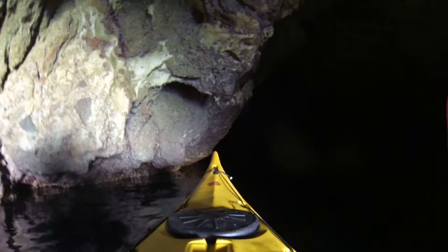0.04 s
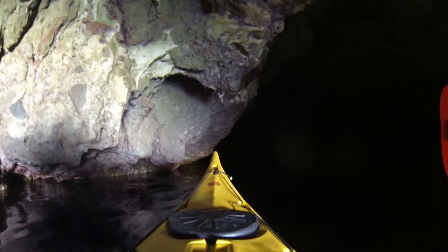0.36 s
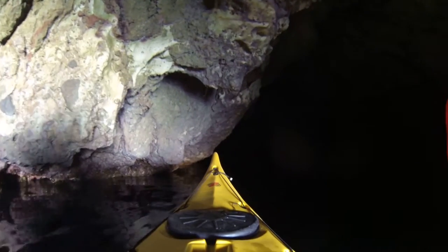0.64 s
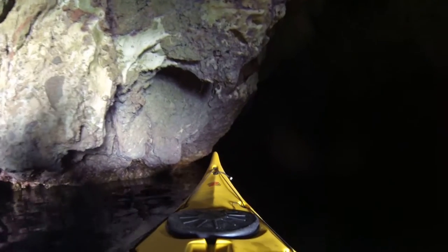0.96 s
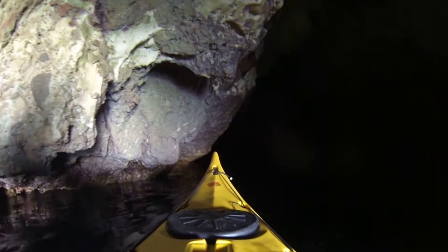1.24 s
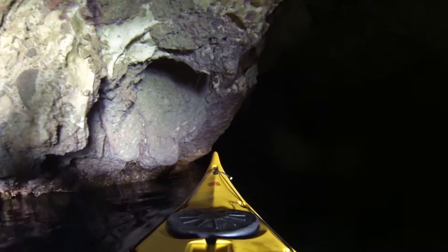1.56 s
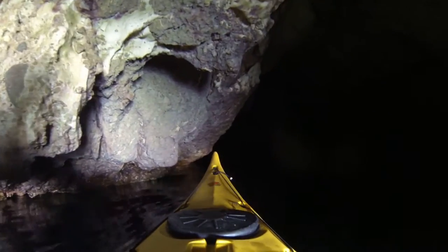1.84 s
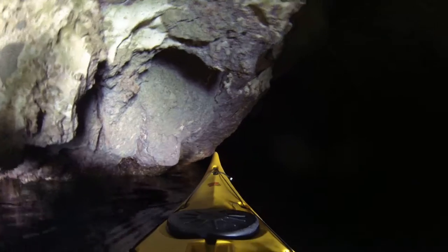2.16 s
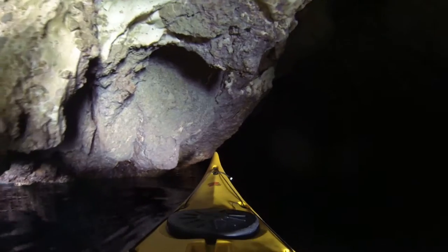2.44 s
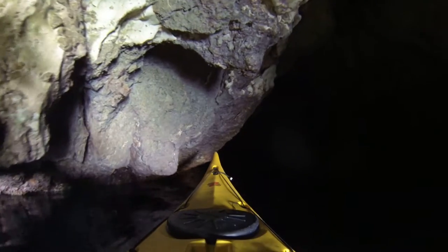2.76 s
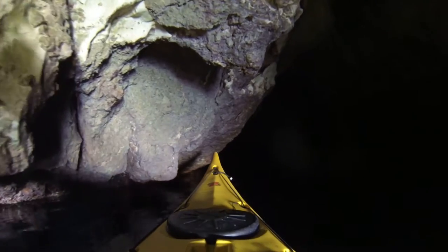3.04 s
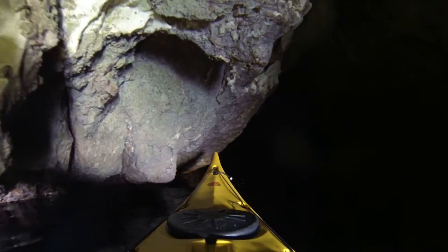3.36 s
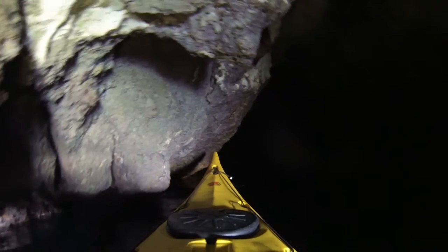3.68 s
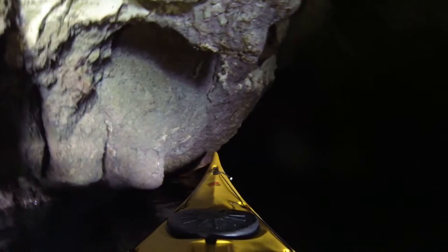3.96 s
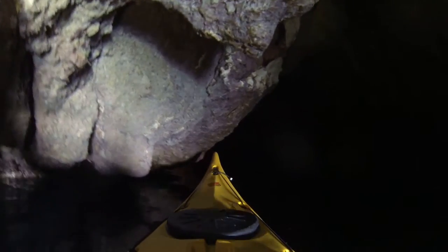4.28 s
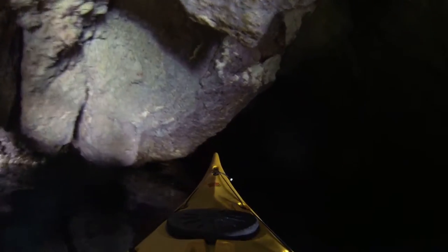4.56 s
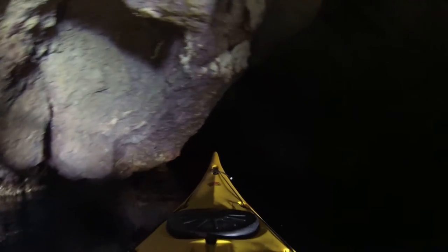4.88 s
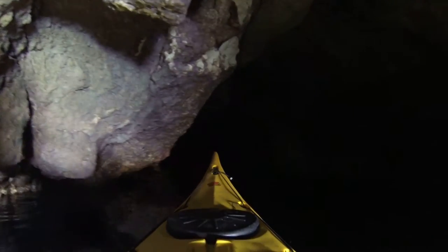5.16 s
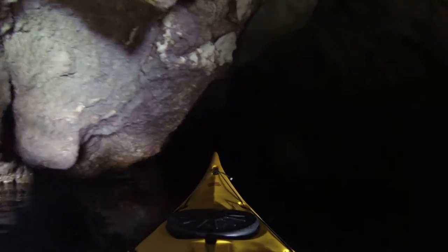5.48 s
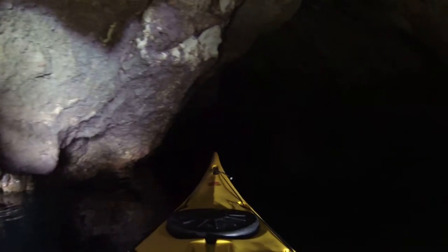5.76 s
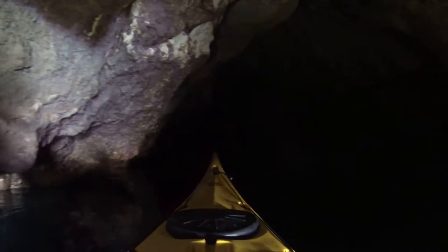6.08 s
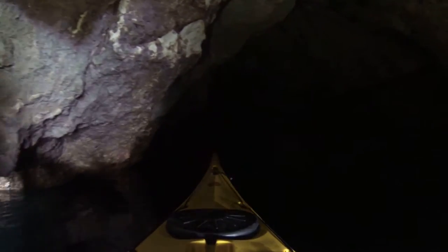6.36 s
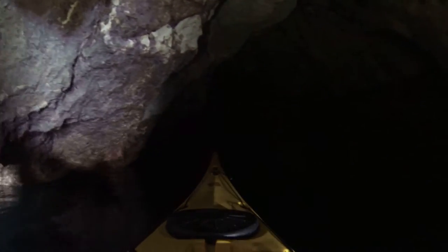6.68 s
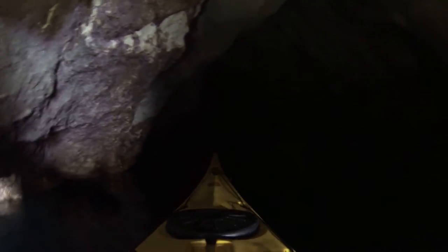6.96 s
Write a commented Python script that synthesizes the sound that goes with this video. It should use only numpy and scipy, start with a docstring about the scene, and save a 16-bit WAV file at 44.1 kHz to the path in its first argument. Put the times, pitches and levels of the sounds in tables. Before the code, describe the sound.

A kayak bumps against rock in a sea cave with a loud, hollow double thud, and the cave air answers with a deep, throbbing boom. Softer knocks and laps on the hull follow. Then small splashes and ringing bubble plinks come from the wall and thin out to a quiet wash. Swell rumbles low throughout. The microphone is close, on the deck, with short echoes off the rock.

```python
"""A kayak's hull bumps the rock in a sea cave and rings, and the air in the cave booms.
Swell rumbles, traps humming air in the hollows and slaps the boat. Water washes along the
walls with small splashes and ringing bubbles, and the close rock throws back echoes.
It is heard from a camera on the deck, whose case colours the water sounds."""
import sys
import numpy as np
from scipy import signal
from scipy.fft import rfft, irfft
from scipy.io import wavfile
from scipy.ndimage import uniform_filter1d

SR = 44100
rng = np.random.default_rng(int(sys.argv[2]) if len(sys.argv) > 2 else 0)


def output_pcm(signal):
    """Save a mono or channel-first signal as 16-bit PCM at the path in sys.argv[1].

    Samples are clipped to [-1, 1] before scaling.
    """
    pcm = np.clip(np.atleast_2d(signal).T, -1, 1) * 32767
    wavfile.write(sys.argv[1], SR, np.round(pcm).astype(np.int16))


N = 309582
TIME = np.arange(N) / SR

# Levels are relative. t60 is the time a sound takes to fade by 60 dB.
# the hull hits the rock: t/s, level/dB, contact time/s, slap compared with the blow/dB, slap t60/s
ROCK_KNOCKS = [(0.2419, -33.5, 0.00066, 14, 0.047), (0.47, -18.5, 0.0039, -23, 0.18),
               (0.492, -7.5, 0.0096, -14.5, 0.17), (.528, -3.5, 0.0015, -2.5, 0.33),
               (0.554, -26.5, .008, 16.5, 0.3), (1.388, -23.5, 0.0015, -6, 0.63),
               (1.545, -21, 0.007, 0.5, 0.11)]
# water laps against the hull: t/s, level/dB
HULL_LAPS = [(1.023, -17.5), (1.919, -20.5), (1.966, -23), (3.44, -29.5), (3.704, -27), (5.632, -27.5),
             (5.911, -31), (6.282, -32), (6.56, -36), (6.7, -31.5)]
# the tones a struck hull rings with: f/Hz, level/dB, t60/s
HULL_TONES = [(93.3, -9.5, 0.25), (110.2, 0.5, 0.23), (132.8, -4, 0.19), (162.8, -6.5, 0.25),
              (200.2, -3.5, 0.12), (261, -24.5, 0.26), (287.2, -12, 0.092), (395, -11.5, 0.13),
              (446, -29.5, 0.32), (654, -49, 0.061), (785, -37, .05), (958, -10, 0.038)]
# the short clack right where the hull is hit: f/Hz, level/dB, t60/s
CLACK_TONES = [(297, -13.5, 0.088), (864, -20.5, 0.052), (1478, -11, 0.045)]
# the deep tones of the air in the cave: f/Hz, level/dB, t60/s
CAVE_TONES = [(35.9, -17.7, .98), (39.1, -19.3, 1.9), (41.8, -3.9, 1.03), (46.9, -20.2, 1.7)]
# the swell rises and falls: t/s, rumble level/dB, slosh level/dB
SWELL_LEVELS = [(0, -43, -53.5), (1.15, -35, -52.5), (1.75, -42, -58), (2.8, -46.5, -57), (3.5, -43.5, -55),
                (4.2, -49.5, -61), (4.6, -42, -59), (5.15, -52.5, -63), (5.55, -45, -58),
                (6.03, -48, -61.5), (7.02, -42.5, -62.5)]
# the swell closes a hollow in the rock: t/s, level/dB, f/Hz, length/s
HOLLOW_GULPS = [(0.367, -31, 49.5, .12), (0.836, -31.5, 95.2, 0.18), (1.285, -30, 37.9, 0.18),
                (2.008, -27, 39.7, 0.17), (2.251, -33.5, 92.4, 0.23), (2.632, -35, 89.5, 0.23),
                (2.781, -36, 86, 0.3), (3.396, -36, 64.4, 0.13), (4.419, -38, 39, 0.19),
                (4.866, -35, 42.6, 0.1), (5.381, -42, 93.1, 0.28), (6.096, -32.5, 43.2, 0.097),
                (6.722, -34.5, 47.1, 0.16)]
# small waves run up the rock: t/s, level/dB, hold time/s
SMALL_WAVES = [(0, -57, 0.64), (0.542, -51, 0.48), (2.106, -54, 0.43), (2.762, -53, 0.18),
               (2.99, -55, 0.24), (3.334, -54, 0.16), (4.215, -64.5, .08), (4.975, -61, 0.14),
               (5.332, -56, 0.091), (5.668, -62.5, 0.36), (6.057, -56.5, 0.28), (6.405, -59, 0.26),
               (6.664, -53.5, 0.11), (6.898, -57.5, .1)]
# ripples break on the rock: t/s, level/dB, rise time/s, t60/s, treble cutoff/Hz
ROCK_SPLASHES = [(2.068, -48, 0.003, 0.16, 2500), (2.229, -44.5, 0.0097, 0.9, 12000),
                 (2.273, -43, 0.013, 0.33, 9000), (2.303, -37.5, 0.0015, 0.075, 9000),
                 (2.551, -44.5, .005, 0.2, 2500), (2.735, -46.5, 0.0047, 0.21, 5030),
                 (2.957, -42.5, 0.0017, 0.12, 1000), (2.975, -39.5, 0.0074, 0.12, 9000),
                 (3.026, -41.5, 0.0018, 0.1, 2500), (3.11, -47, 0.0016, 0.1, 8850),
                 (3.169, -39.5, 0.0017, 0.063, 2500), (3.369, -41, 0.002, 0.079, 2000),
                 (3.534, -48.5, 0.001, 0.18, 2480), (6.579, -52, 0.022, 0.5, 12000),
                 (6.688, -53, 0.036, 0.32, 4000)]
# large bubbles, plus two drip ticks at 3.497 s and 3.882 s: t/s, level/dB, f/Hz
BIG_BUBBLES = [(0.363, -43.5, 296), (2.04, -50, 790), (2.039, -44, 1500), (2.071, -44, 1476),
               (2.16, -51, 560), (2.189, -39.5, 1395), (2.28, -31.5, 1510), (2.37, -38, 1566),
               (2.475, -38.5, 1474), (2.558, -41.5, 2500), (2.722, -44, 2440), (3.03, -33, 1590),
               (3.091, -33, 1584), (3.378, -49, 696), (3.497, -55, 11000), (3.534, -39, 1550),
               (3.658, -37, 1600), (3.77, -48, 797), (3.831, -46.5, 1590), (3.882, -57.5, 5300),
               (6.112, -42, 1510), (6.265, -43.5, 1690), (6.75, -40, 1663)]
# how strong each noisy sound is from bass to treble: f/Hz, level/dB
SLAP_SPECTRUM = [(60, 8), (190, 10.5), (380, 10), (480, -15.5), (700, 0), (1000, -16.5), (1250, -13),
                 (1600, -5.5), (2300, -9.5), (4000, -17), (4700, -23.5), (5600, -18.5), (7000, -29.5),
                 (14000, -49)]
RUMBLE_SPECTRUM = [(10, -17), (28, -1), (42, 11), (54, 5.5), (70, 0.5), (89, 6.5), (100, -2), (115, -16.5),
                   (160, -62)]
SLOSH_SPECTRUM = [(70, -13.5), (115, 2), (175, 0), (230, -9), (380, -10.5), (600, -20.5), (1200, -21.5),
                  (4000, -89.5)]
WASH_SPECTRUM = [(200, 1.5), (450, -5), (700, -9), (1220, -12.5), (1450, 0), (1800, -1.5), (2150, -5.5),
                 (3150, -9), (4600, -21.5), (5400, -17.5), (6500, -27), (9000, -34.5), (15000, -54)]
SPRAY_SPECTRUM = [(200, -24), (600, -16.5), (1220, -18.5), (1550, -4.5), (2100, -17), (3200, -14),
                  (4600, -25.5), (5400, -23.5), (7000, -32.5), (10000, -39), (15000, -43)]
HISS_SPECTRUM = [(100, -12), (600, 15), (2000, 8), (5000, 4), (9000, -4), (14500, -9), (16000, -22)]
# pitches that the camera case makes louder: f/Hz, width/Hz, boost/dB
CASE_PEAKS = [(870, 70, 3.5), (1051, 140, 9), (1407, 246, 7), (1680, 160, 2)]


def hull_knocks(slap_db=-23, lap_contact_s=0.0086, lap_slap_db=-12, lap_t60_s=0.23):
    """Each blow rings the hull and makes water slap. A long, soft push rings mainly the low tones."""
    t, knocks, slap_power = TIME[:SR], np.zeros(N), np.zeros(N)
    shell = ring(HULL_TONES, t, rise_cycles=2.2)
    clack = ring(CLACK_TONES, t, rise_cycles=0.99)
    laps = [(s, db, lap_contact_s, lap_slap_db, lap_t60_s) for s, db in HULL_LAPS]
    for start, db, contact, wet_db, t60 in ROCK_KNOCKS + laps:
        push = t * np.exp(-2 * np.pi * t / contact)
        body = shell + amp(wet_db) * clack  # a hard slap clacks too
        add(knocks, start, amp(db) * signal.fftconvolve(body, push / push.sum())[:SR])
        slap = amp(db + wet_db) * burst(t, 0.84 * contact, t60)  # a soft contact slaps softly
        add(slap_power, start, slap ** 2)
    slap_noise = steadied(noise(SLAP_SPECTRUM, CASE_PEAKS), samples=500)
    return knocks, amp(slap_db) * np.sqrt(slap_power) * slap_noise


def cave_boom(bump_s=0.538):
    """The bump sets the cave's air ringing. Its deep tones lie close together, so they throb."""
    out = np.zeros(N)
    add(out, bump_s, ring(CAVE_TONES, TIME[:2 * SR], rise_cycles=1.27))
    return out


def swell(level_db=-0.5):
    """Heaving water makes a deep rumble and sloshes along the hull."""
    times, rumble_db, slosh_db = np.transpose(SWELL_LEVELS)
    rumble = amp(np.interp(TIME, times, rumble_db)) * steadied(noise(RUMBLE_SPECTRUM), samples=6000)
    slosh = amp(np.interp(TIME, times, slosh_db)) * steadied(noise(SLOSH_SPECTRUM), samples=6000)
    return amp(level_db) * (rumble + slosh)


def gulps(level_db=-1, waver=0.052):
    """Air trapped by the swell hums briefly at an unsteady pitch."""
    out = np.zeros(N)
    wander = 1 + waver * drift(hz=40)
    for start, db, hz, length in HOLLOW_GULPS:
        pitch = hz * wander[round(start * SR):][:round(length * SR)]
        phase = 2 * np.pi * np.cumsum(pitch) / SR
        fade = signal.windows.cosine(len(phase)) ** 0.67
        add(out, start, amp(db + level_db) * fade * np.sin(phase))
    return out


def wash(fizz_db=-2.5, drops_db=-7, gurgle_db=-10, flutter_db=0.5):
    """Water runs over the rock as fizz, countless droplets and a gurgle of longer-ringing bubbles."""
    fizz = amp(fizz_db) * rng.standard_normal(N)
    drops = amp(drops_db) * tiny_bubbles(density=2000, spread_db=0, ring_cycles=22, pitches=30)
    gurgle = amp(gurgle_db) * tiny_bubbles(density=330, spread_db=1.5, ring_cycles=115, pitches=47)
    flutter = amp(flutter_db * drift(hz=12))
    return colour(wave_strength() * flutter * (fizz + drops + gurgle), WASH_SPECTRUM, CASE_PEAKS)


def wave_strength(calm_db=-63.5, rise_s=0.013, fall_s=0.062, trickle_s=0.47, trickle_share=0.73):
    """Each small wave rises above the calm wash and holds. Some drops back, the rest trickles off."""
    power = np.full(N, amp(calm_db) ** 2)
    rise = 1 - np.exp(-TIME / rise_s)
    for start, db, hold in SMALL_WAVES:
        after_hold = np.maximum(TIME - hold, 0)
        fall = (1 - trickle_share) * np.exp(-after_hold / fall_s)
        trickle = trickle_share * np.exp(-after_hold / trickle_s)
        add(power, start, (amp(db) * rise * (fall + trickle)) ** 2)
    return np.sqrt(power)


def tiny_bubbles(density, spread_db, ring_cycles, pitches):
    """Tiny bubbles ping at random moments, each rising in pitch as it fades."""
    t, out = TIME[:2048], np.zeros(N)
    for hz in np.geomspace(500, 13000, pitches):
        strength = amp(spread_db * np.minimum(rng.exponential(1, N), 4))
        chance = density * (hz / 2000) ** 0.5 / pitches / SR  # high pings come more often
        starts = rng.random(N) < chance
        ping = burst(t, 0.4 / hz, ring_cycles / hz) * np.sin(2 * np.pi * hz * t * (1 + 3 * t))
        out += signal.oaconvolve(strength * starts, ping * hz ** 0.75)[:N]
    return unit(out)


def splashes(level_db=1, tick_db=10):
    """Ripples break on the rock as dull plops and brighter sprays. Quick ones start with a tick."""
    t, out = TIME[:SR], np.zeros(N)
    for start, db, rise, t60, cutoff_hz in ROCK_SPLASHES:
        spray = burst(t, rise, t60) * rng.standard_normal(SR)
        spray[round(0.002 * SR)] += amp(tick_db) * 0.004 / rise
        smoothing = np.exp(-2 * np.pi * cutoff_hz / SR)
        softened = signal.lfilter([1 - smoothing], [1, -smoothing], spray)
        add(out, start, amp(db + level_db) * softened)
    return colour(out, SPRAY_SPECTRUM, CASE_PEAKS)


def big_bubbles(level_db=-1, glide=0.058, wobble=0.62, rise_cycles=2.1, ring_cycles=102):
    """Larger bubbles ring, wobble and rise in pitch as they reach the surface. Low ones ring longer."""
    t, out = TIME[:SR // 3], np.zeros(N)
    for start, db, hz in BIG_BUBBLES:
        t60 = ring_cycles / hz
        tone = np.sin(2 * np.pi * hz * t * (1 + glide * t / t60))
        add(out, start, amp(db + level_db) * burst(t, rise_cycles / hz, t60) * tone)
    return out * (1 + wobble * drift(hz=170))


def cave_echoes(sound, t60=1.0, rise_s=0.0013, echoes_per_s=2000):
    """The close rock walls scatter a sound into many fading echoes."""
    arrivals = rng.standard_normal(SR) * (rng.random(SR) < echoes_per_s / SR)
    echoes = arrivals * burst(TIME[:SR], rise_s, t60)
    return signal.oaconvolve(sound, echoes / np.linalg.norm(echoes))[:N]


def ring(tones, t, rise_cycles):
    """Pure tones that each build up and fade, as in something struck."""
    return sum(amp(db) * burst(t, rise_cycles / hz, t60) * np.sin(2 * np.pi * hz * t)
               for hz, db, t60 in tones)


def burst(t, rise, t60):
    """A loudness curve that grows, then dies away."""
    return (1 - np.exp(-t / rise)) * np.exp(-np.log(1000) * t / t60)


def colour(sound, spectrum, peaks=()):
    """Shapes a sound's bass and treble to a spectrum, with extra peaks on top."""
    hz = np.fft.rfftfreq(32768, 1 / SR)
    points_hz, levels = np.transpose(spectrum)
    db = np.interp(np.log(hz + 1), np.log(points_hz), levels)
    for centre, width, boost in peaks:
        db += boost / (1 + (2 * (hz - centre) / width) ** 2)
    log_gain = np.log(amp(np.r_[db, db[-2:0:-1]]))
    response = np.exp(np.conj(signal.hilbert(log_gain)))  # rings after a sound, never before it
    taps = irfft(response[:len(hz)])[:len(hz)]
    return signal.oaconvolve(sound, taps / np.linalg.norm(taps))[:len(sound)]


def noise(spectrum, peaks=()):
    """Shaped noise of strength 1."""
    return unit(colour(rng.standard_normal(N), spectrum, peaks))


def drift(hz):
    """A random wobble of strength 1, mostly slower than hz."""
    f = np.fft.rfftfreq(N, 1 / SR)
    return unit(irfft(rfft(rng.standard_normal(N)) / (1 + (f / hz) ** 4), N))


def steadied(sound, samples):
    """Evens out the loudness over stretches of this many samples."""
    return sound / np.sqrt(uniform_filter1d(sound ** 2, samples) + 1e-3)


def amp(db):
    """Turns decibels into a number to multiply by."""
    return 10 ** (np.asarray(db) / 20)


def unit(sound):
    """Scales a sound to an average strength (rms) of 1."""
    return sound / np.sqrt(np.mean(sound ** 2) + 1e-20)


def add(mix, start_s, sound):
    """Mixes a sound in at its start time."""
    part = mix[max(round(start_s * SR), 0):][:len(sound)]
    part += sound[:len(part)]


def scene():
    """The boat and swell are close by. The walls throw back the water, bubbles and knocks."""
    knocks, slaps = hull_knocks()
    plinks = big_bubbles()
    water = wash() + splashes() + slaps
    echoes = cave_echoes(amp(-8.5) * water + amp(-9) * plinks + amp(-17) * knocks)
    return (knocks + cave_boom() + swell() + gulps() + water + plinks + echoes)[None]


def record(dry, hiss_db=-70, whine_db=-95, whine_hz=14050, cutoff_hz=15100):
    """The camera adds hiss and a thin whine, then cuts off the highest treble."""
    hiss = amp(hiss_db) * noise(HISS_SPECTRUM)
    whine = amp(whine_db) * np.sqrt(2) * np.sin(2 * np.pi * whine_hz * TIME)
    treble_cut = signal.firwin(511, cutoff_hz, window=("kaiser", 9), fs=SR)
    return signal.oaconvolve(dry + hiss + whine, treble_cut[None], "same")


dry = scene()
out = record(dry)
output_pcm(out)
```